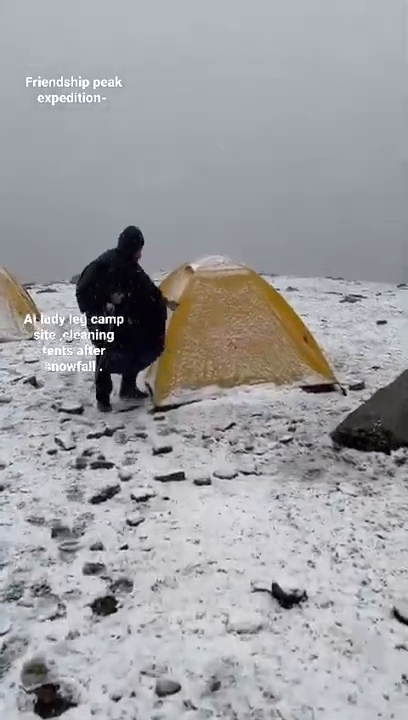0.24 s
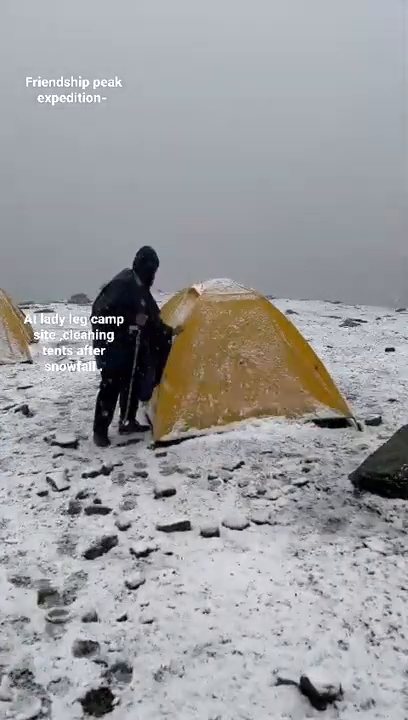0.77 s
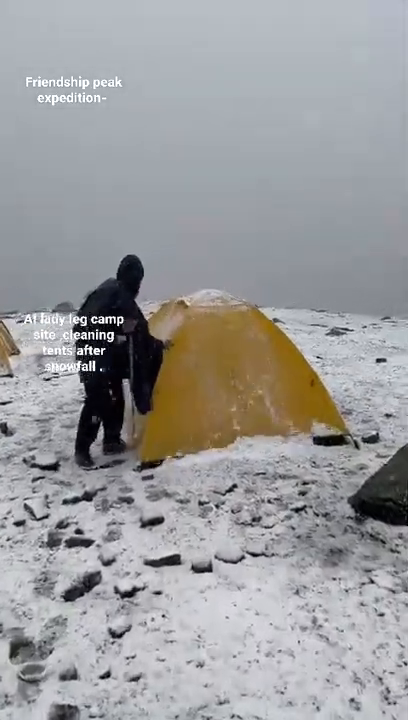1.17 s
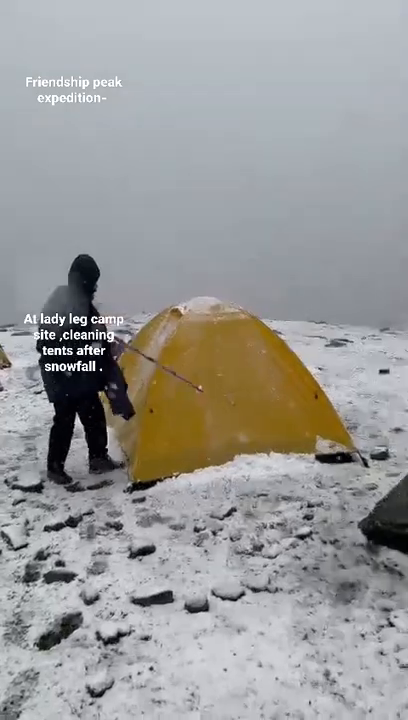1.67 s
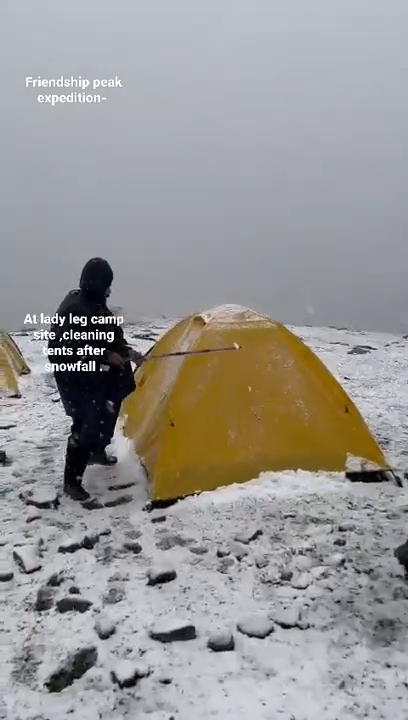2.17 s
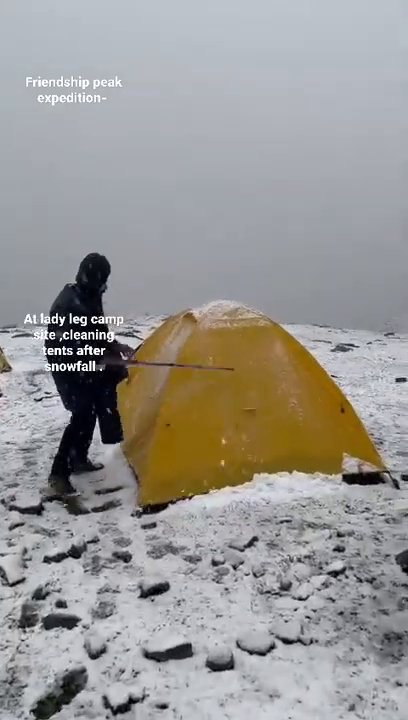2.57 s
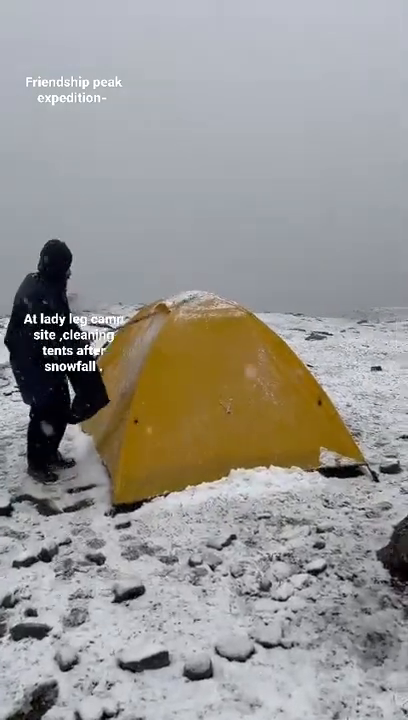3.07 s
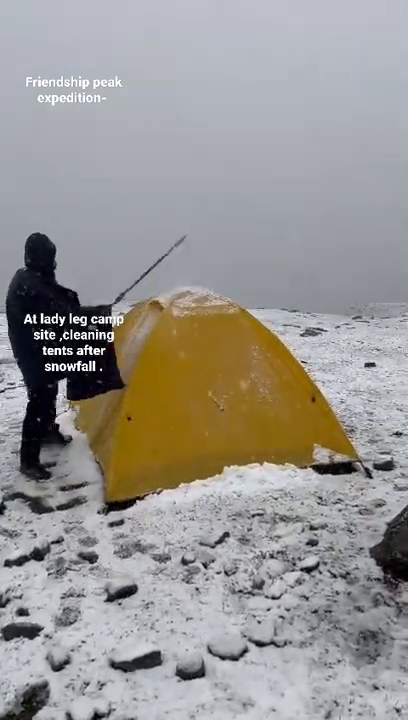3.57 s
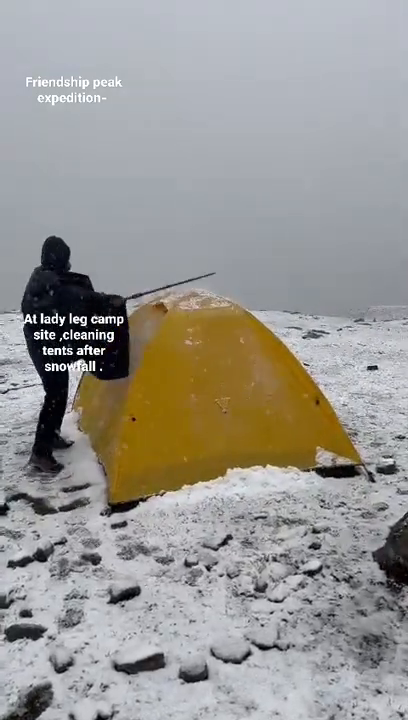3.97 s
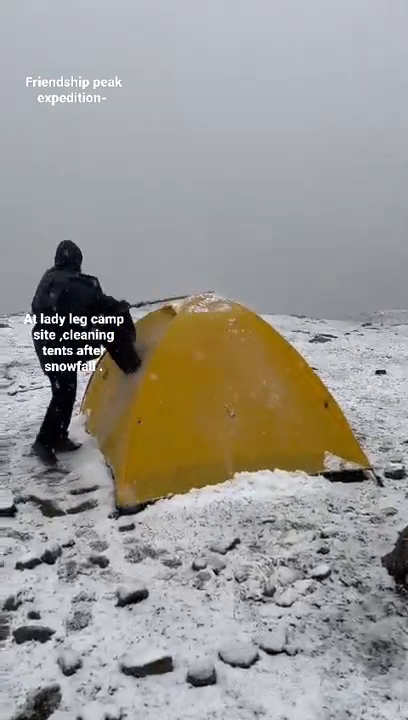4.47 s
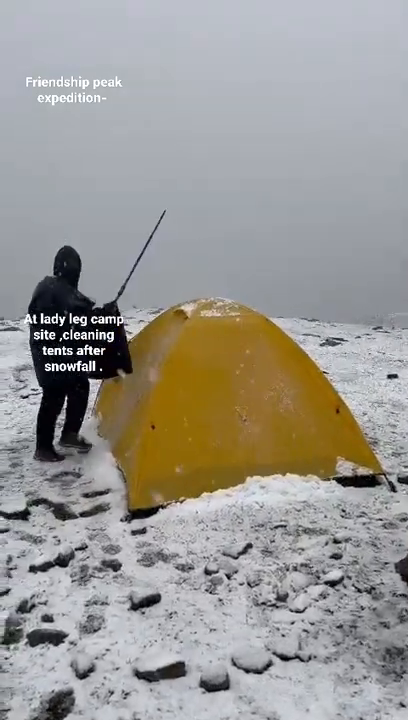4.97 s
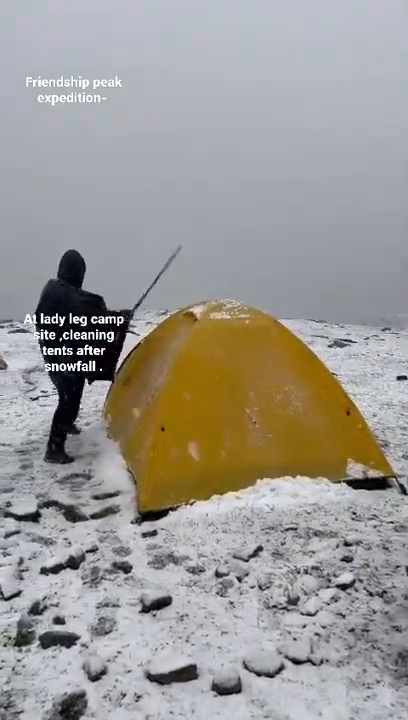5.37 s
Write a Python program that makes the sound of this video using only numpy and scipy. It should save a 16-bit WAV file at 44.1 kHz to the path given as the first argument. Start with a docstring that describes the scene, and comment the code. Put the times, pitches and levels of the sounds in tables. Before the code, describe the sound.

Sharp pole smacks and drum-like thumps on a tent follow soft cloth rustling, while loose snow patters and slides down.

```python
"""A snow-covered tent in the open on a mountain. Its cloth rustles, crumbs patter and loose snow hisses down
it throughout. Boots shift in the snow, creases flick and a faint hum comes and goes. The tent is shaken
by hand: walls heave and panels pop taut. A pole clicks on something hard, then smacks the taut fly
eight times. Each blow cracks, sends a falling whoop through the cloth and ends in a drum-like thump;
the cloth rattles, snow sprays off and the tent sways on."""
import sys
import numpy as np
from scipy import signal
from scipy.fft import rfft, irfft
from scipy.io import wavfile

SR = 44100
rng = np.random.default_rng(int(sys.argv[2]) if len(sys.argv) > 2 else 0)


def master_out(mix):
    """Clip the mix to full scale and print it as 16-bit PCM to the path in sys.argv[1]."""
    frames = np.transpose(np.atleast_2d(mix))
    ceiling = np.clip(frames, -1, 1)
    pcm = np.round(ceiling * 32767).astype(np.int16)
    wavfile.write(sys.argv[1], SR, pcm)


N = 248238
TIME = np.arange(N) / SR
LEAD_S = 0.02  # silence ahead of each impact
FIRM_DB = -20  # thump of a firm blow, the reference for sway and rattle

# blows of the pole: t/s, crack/dB, brightness/(dB per octave), crack t60/s, contact along the pole/0-1,
# shaft ring/dB, ping f/Hz, ping/dB, cloth tension/factor on the knock's pitch, knock/dB, whoop/dB,
# thump/dB, panel f/Hz, rattle/dB, spray/dB, loosened snow/dB
BLOWS = [ (2.494, -20, 5.5, 0.036, 0.38, -32, 2720, -23, 1.23, -22, -31, -36.5, 76.8, -34.5, -38, -58),
         (2.9445, -24, 4, 0.038, .5, -33, 1540, -23, 1.25, -29, -35, -49, 95, -41.5, -44.5, -57.5),
         (3.3968, -24.5, 3.5, 0.066, 0, -30, 1510, -27, .88, -22, -21.5, -25.5, 85.2, -32, -64, -63),
         (3.7119, -18, -3, 0.056, .39, -31, 4160, -18.5, 1.06, -16, -28, -15, 106.6, -34.5, -46, -59),
         (3.9840, -16.5, 2, 0.048, 0.37, -31, 3800, -17, 1.38, -16.5, -17.5, -12, 92.4, -28, -41, -57.5),
         (4.269, -17, 3, 0.026, .09, -27.5, 2050, -21, 1.53, -18.5, -17.5, -14.5, 96.3, -27, -41, -56.5),
         (4.539, -16.5, 10, 0.015, .5, -21.5, 6100, -10, 1.04, -23, -14, -20, 82.1, -27, -40.5, -62.5),
         (5.5223, -20.5, 1.5, 0.04, .39, -28.5, 2570, -13.5, 1.37, -25, -24.5, -30, 72.4, -34.5, -43.5, -76)]
# colour of the pole's first bright snap: f/Hz, level/dB
SNAP = [(400, -30), (1200, 8), (3000, 1.5), (5000, 13), (7000, -5), (9000, 7), (11000, -14.5),
        (11700, -10.5), (12600, -50)]
# colour of cracking cloth: f/Hz, level/dB
CRACK = [(60, -6), (250, -1), (500, 6), (800, 1), (1400, 2), (2000, -4.5), (2700, -2.5), (3400, -10),
         (4600, -11), (6500, -15.5), (8600, -19), (11200, -27.5), (12500, -49)]


def amp(db):
    """Decibels to gain."""
    return 10 ** (np.asarray(db) / 20)


def unit(x):
    """Scales to an rms of one."""
    return x / np.sqrt(np.mean(x ** 2) + 1e-20)


def curve(points, hz):
    """Joins (f/Hz, value) points on a log-frequency axis."""
    f, value = np.transpose(points)
    return np.interp(np.log(hz + 1), np.log(f + 1), value)


def add(mix, s, sound):
    """Mixes a sound in at s seconds."""
    part = mix[:, round(s * SR):][:, :sound.shape[-1]]
    part += sound[..., :part.shape[1]]


def clock(n):
    """Seconds since an impact, held at zero through the silent lead."""
    return np.maximum(np.arange(n) / SR - LEAD_S, 0)


def dying(t, rise, t60):
    """A quick attack, then an exponential decay."""
    return (1 - np.exp(-t / rise)) * np.exp(-np.log(1000) * t / t60)


def wander(n, hz):
    """Random drift with an rms of one, moving at rates up to about hz."""
    f = np.fft.rfftfreq(n, 1 / SR)
    return unit(irfft(rfft(rng.standard_normal(n)) * np.exp(-(f / hz) ** 2) * (f > 0), n))


def flicker(n, db, hz):
    """A gain that wanders by db rms: surges when slow, grit when fast."""
    return amp(db * wander(n, hz))


def noise(spectrum, envelope, tilt_db=0):
    """Coloured stereo noise that follows an envelope; tilt_db per octave tips its treble."""
    # likeness of left and right: f/Hz, correlation/0-1
    likeness = [(200, .995), (1000, .88), (1800, .9), (2600, .7), (4600, .65), (5800, .97), (8000, .96),
                (11000, .92)]
    n = len(envelope)
    hz = np.fft.rfftfreq(n, 1 / SR)
    mid, side = rfft(rng.standard_normal((2, n)) * envelope)
    same = curve(likeness, hz)
    pair = np.sqrt(1 + same) * mid + np.sqrt(1 - same) * side * np.array([[1], [-1]])
    colour = amp(curve(spectrum, hz) + tilt_db * np.log2(1 + hz / 1000))
    return unit(irfft(pair * colour, n)) * np.sqrt(np.mean(envelope ** 2))


def ringing(t, modes, level_db, rise=0.00048):
    """The dying modes of a struck thing."""
    return sum(amp(level_db + db) * dying(t, rise, t60) * np.sin(2 * np.pi * hz * t)
               for hz, db, t60 in modes)


def stirred_cloth():
    """Moving cloth billows, rustles and sheds snow and crumbs of crust, all louder the harder it moves."""
    # how hard the cloth is stirred: t/s, level/dB
    stirring = [(0, -64.5), (.19, -58), (.33, -60), (.71, -54.5), (.745, -45.5), (.91, -48), (.965, -40.5),
                (1.03, -39.5), (1.12, -47.5), (1.32, -47.5), (1.52, -55), (2.2, -61.5), (2.46, -56),
                (2.6, -47.5), (2.76, -55), (3.15, -55.5), (3.6, -59), (4.15, -54.5), (4.72, -57.5),
                (5.24, -64.5), (5.62, -55.5)]
    # colour of the billowing walls: f/Hz, level/dB
    billow_colour = [(20, -31), (35, -3), (55, 7.5), (120, 0), (200, -2), (320, -17), (700, -65)]
    # colour of the rustle: f/Hz, level/dB
    rustle_colour = [(130, -4.5), (270, 2), (650, -1.5), (1000, -4), (1500, -6.5), (2400, -8.5),
                     (4000, -13), (9000, -52), (12500, -85)]
    cloth_db = np.interp(TIME, *np.transpose(stirring))
    stir_db = cloth_db + 56  # relative to a gentle stir
    flaps = unit(flicker(N, db=1.5, hz=30))
    billow = noise(billow_colour, amp(-53 + 0.81 * stir_db) * flaps)
    creases = unit(flicker(N, db=1.8, hz=200))
    surges = unit(flicker(N, db=1.5, hz=21.3))
    rustle = noise(rustle_colour, amp(cloth_db - 3) * creases * surges)
    crust = amp(cloth_db - 9) * crumbs(N, range_hz=(528, 4540), per_s=480, pitches=24)
    return billow + rustle + crust + sliding_snow(stir_db)


def crumbs(n, range_hz, per_s, pitches):
    """Grains of snow patter on the cloth, each ringing for a few cycles; most are small."""
    out, t = np.zeros(n), np.arange(SR // 40) / SR
    for hz in np.geomspace(*range_hz, pitches):
        sizes = amp(-16 * rng.random(n)) * rng.choice([-1, 1], n)
        lands = rng.random(n) < per_s / pitches / SR
        grain = dying(t, rise=0.5 / hz, t60=9.7 / hz) * np.sin(2 * np.pi * hz * t)
        out += signal.oaconvolve(lands * sizes, grain)[:n]
    return unit(out)


def sliding_snow(stir_db):
    """Snow and icy pellets run down when the cloth stirs, after a tug or blow, and as a patch lets go."""
    # tugs of the hand: t/s, loosened snow/dB
    tugs = [(.722, -56.5), (.94, -57.5)]
    # patches slipping off late: crest t/s, half length/s, level/dB
    slips = [(1.675, 0.31, -60.5), (3.3, 0.053, -59.5), (4.98, 0.28, -59)]
    # colour of the hiss as heard, bright with hollow gaps near 6 and 10 kHz: f/Hz, level/dB
    heard_colour = [(800, 5), (2000, 10.5), (3200, 9), (4500, 10.5), (5250, 12.5), (5900, -34),
                    (6500, -15.5), (7000, 7), (8900, 10), (10400, -13.5), (11400, 0.5), (12300, -67)]
    lag_s = 0.017  # the snow trails the cloth
    hold = np.exp(-1 / (lag_s * SR))
    power = signal.lfilter([1 - hold], [1, -hold], amp(-66 + 0.82 * stir_db) ** 2)
    for s, *_, snow_db in tugs + BLOWS:
        power += (amp(snow_db) * dying(np.maximum(TIME - s, 0), rise=0.0075, t60=4.25)) ** 2
    for s, half_length, slip_db in slips:
        power += (amp(slip_db) * np.exp(-((TIME - s) / half_length) ** 2 / 2)) ** 2
    flow = np.sqrt(power) * flicker(N, db=1, hz=15)  # it runs in spurts
    grains = unit(flicker(N, db=1.5, hz=2000))
    pellets = amp(-15.5) * flow * crumbs(N, range_hz=(2200, 4700), per_s=160, pitches=10)
    return noise(heard_colour, flow * grains) + pellets


def hum():
    """A faint low hum swells now and then, its pitch wavering."""
    # swells: crest t/s, half length/s, f/Hz, level/dB
    swells = [(0.303, 0.21, 284.3, -62.5), (1.744, 0.11, 150.3, -53.5), (3.38, 0.17, 249, -63),
              (4.19, 0.27, 173, -52), (4.44, 0.31, 239.8, -58.5), (5.163, 0.18, 219.4, -59.5)]
    out = np.zeros(N)
    for s, half_length, hz, level_db in swells:
        turns = np.cumsum(hz * (1 + 0.0259 * wander(N, hz=13.3))) / SR
        out += amp(level_db) * np.exp(-((TIME - s) / half_length) ** 2) * np.sin(2 * np.pi * turns)
    return out


def boots():
    """Boots press into thin snow: a short, gritty crunch."""
    # shifts of the feet: t/s, level/dB
    steps = [(.145, -54), (.375, -55.5), (0.536, -52), (1.94, -67), (3.101, -50)]
    # colour of the crunch: f/Hz, level/dB
    crunch = [(150, -7), (500, 4), (1300, 0), (2200, -8), (4500, -6), (6000, -22), (8500, -20),
              (12000, -60)]
    out, t = np.zeros((2, N)), clock(SR // 4)
    for s, level_db in steps:
        grit = flicker(len(t), db=3, hz=400)
        add(out, s - LEAD_S, amp(level_db) * noise(crunch, dying(t, rise=0.011, t60=0.19) * grit))
    return out


def crinkles():
    """A crease flicks over or a clod lands: a dry tick about an octave wide."""
    # creases and clods: t/s, level/dB, centre f/Hz
    ticks = [(0.167, -57, 900), (.262, -53, 800), (.394, -58, 1500), (.554, -59, 2800), (.694, -45, 800),
             (.710, -53, 2500), (0.747, -40, 1500), (.968, -40, 1300), (.988, -43, 1500),
             (1.009, -45, 1700), (1.021, -44, 1100), (1.072, -37, 1500), (1.454, -48, 3000),
             (1.626, -46, 420), (1.720, -45, 1090), (1.726, -45, 4300), (1.752, -43.5, 700),
             (1.952, -46.5, 900), (2.005, -56, 1000), (2.072, -61, 1200), (2.231, -57, 1900),
             (2.447, -40, 850), (2.556, -38, 1100), (2.595, -39, 1000), (2.611, -38, 1150),
             (2.701, -46, 900), (2.791, -47.5, 2400), (2.863, -45, 650), (3.009, -41, 1600),
             (3.108, -45, 1000), (3.122, -41, 750), (3.325, -46, 800), (3.421, -36, 8000),
             (3.454, -49, 800), (3.843, -46, 2210), (4.109, -46, 900), (4.292, -47, 2700),
             (4.625, -41, 900), (4.727, -46, 2200), (4.774, -48, 800), (5.092, -61, 2600),
             (5.283, -52, 1900), (5.36, -42.5, 1390), (5.599, -46, 1090)]
    out, t = np.zeros((2, N)), clock(SR // 10)
    octaves = np.arange(-4, 5) / 2
    for s, level_db, hz in ticks:
        band = np.transpose([hz * 2 ** octaves, -13.5 * octaves ** 2])
        add(out, s - LEAD_S, amp(level_db) * noise(band, dying(t, rise=0.00061, t60=0.018)))
    return out


def wall_heaves():
    """A whole wall swings out and back: a soft bump of a cycle or two, with no snap."""
    # heaves: crest t/s, level/dB, f/Hz
    heaves = [(.69, -37.5, 59.4), (0.779, -32, 66.6), (1.029, -31.5, 75), (1.464, -36.5, 85),
              (2.799, -41, 69.6), (4.782, -48, 78.6), (4.849, -39, 66), (5.081, -41, 84),
              (5.19, -44.5, 74.6), (5.25, -43, 63.6), (5.555, -30, 132)]
    out, t = np.zeros((2, N)), np.arange(SR // 5) / SR
    middle = t.mean()
    for s, level_db, hz in heaves:
        cycles = (t - middle) * hz
        bump = np.exp(-(cycles / 0.57) ** 2) * np.cos(2 * np.pi * cycles)
        add(out, s - middle, amp(level_db) * bump)
    return out


def panel_pops():
    """A slack panel jerks tight: a dull snap, a short falling whoop and a thump on its low note."""
    # pops: t/s, snap/dB, whoop/dB, thump/dB, panel f/Hz, fall of the whoop/Hz
    pops = [(0.695, -62, -59, -43, 79, 933), (0.745, -51, -58, -33, 84, 933),
            (0.84, -50, -30.5, -36, 130, 690), (1.009, -47, -41, -37, 93, 933),
            (1.045, -55, -29, -42, 109, 805), (1.233, -67, -40, -31.5, 116, 450),
            (1.261, -80, -35.5, -39, 153, 745), (1.368, -71, -37, -50, 188, 600),
            (1.397, -78, -42, -39, 182, 500), (1.42, -78, -39, -40, 167, 596),
            (1.607, -51, -45, -51, 288, 500), (1.622, -48.5, -34, -57, 162, 660),
            (2.515, -46, -41, -31, 189, 600), (2.572, -50, -55, -29, 214, 500),
            (2.607, -47, -47, -32, 130, 905), (2.628, -52, -40, -38, 132, 600),
            (3.158, -54, -66, -35.5, 97, 930), (3.843, -52.5, -66, -36, 81.4, 933),
            (4.603, -63, -57, -33, 93, 933), (4.624, -56, -34, -45, 120, 930),
            (4.723, -52, -57, -33.5, 120, 780), (5.360, -48, -36, -30.5, 69, 840),
            (5.586, -41, -44, -34.5, 131, 933)]
    out, t = np.zeros((2, N)), clock(SR // 5)
    for s, snap_db, whoop_db, thump_db, panel_hz, fall_hz in pops:
        snap = amp(snap_db + 2.5) * noise(CRACK, dying(t, rise=0.00023, t60=0.085), tilt_db=-5.5)
        panel = membrane(t, whoop_db, thump_db, panel_hz, fall_hz,
                         glide_s=0.0027, whoop_t60=0.051, crest_s=0.00862, width_s=0.0092)
        add(out, s - LEAD_S, snap + panel)
    return out


def membrane(t, whoop_db, thump_db, panel_hz, fall_hz, glide_s, whoop_t60, crest_s, width_s):
    """Short waves leave the cloth first: the tone falls to the panel's note, where the wall thumps."""
    turns = panel_hz * t + fall_hz * glide_s * (1 - np.exp(-t / glide_s))
    tone = np.sin(2 * np.pi * (np.interp(crest_s, t, turns) - turns))  # crosses zero at crest_s
    whoop = amp(whoop_db) * dying(t, rise=0.0016, t60=whoop_t60)
    thump = amp(thump_db) * np.exp(-((t - crest_s) / width_s) ** 2) * (1 - np.exp(-t / 0.011))
    ring = amp(thump_db - 16.5) * dying(t, rise=0.016, t60=0.32)
    return (whoop + thump + ring) * tone


def pole_click(s=2.1562, level_db=-38):
    """The pole knocks lightly on something hard as it is brought round: a tick and a short ring."""
    # tones of the click: f/Hz, level/dB, t60/s
    tones = [(1800, 2, 0.017), (1900, -13, 0.093), (1300, -7, .025), (4430, -8, 0.013), (5020, 0, 0.013),
             (8200, -23, 0.0035)]
    out, t = np.zeros((2, N)), clock(SR // 5)
    tick = amp(level_db - 4.5) * noise(SNAP, dying(t, rise=0.00017, t60=0.0086))
    add(out, s - LEAD_S, tick + ringing(t, tones, level_db))
    return out


def pole_blows():
    """The pole snaps and cracks on the fly, which answers like a drum, rattles and throws off snow."""
    # hollow knock of the cloth round the struck spot: f/Hz, level/dB, t60/s
    knock_modes = [(423, -12, 0.056), (613.5, 2.5, 0.035), (743, 0, 0.045), (954, -8, 0.023),
                   (1360, -21, 0.016)]
    out, t = np.zeros((2, N)), clock(SR // 2)
    for (s, crack_db, bright_db, crack_t60, contact, shaft_db, ping_hz, ping_db, tension,
         knock_db, whoop_db, thump_db, panel_hz, rattle_db, spray_db, _) in BLOWS:
        snap = amp(crack_db + 2) * noise(SNAP, dying(t, rise=0.001, t60=0.014), bright_db)
        slaps = flicker(len(t), db=3.74, hz=1400)  # the shaft lands along its length in tiny slaps
        crack = noise(CRACK, dying(t, rise=0.0016, t60=crack_t60) * slaps, bright_db)
        crack = amp(crack_db + 0.5) * dispersed(damped(crack, t))
        tuned_modes = [(hz * tension, db, t60) for hz, db, t60 in knock_modes]
        knock = ringing(t, tuned_modes, knock_db, rise=0.0038)
        ping = ringing(t, [(ping_hz, 0, 0.014)], ping_db)
        # the lower the panel's note, the later and longer its thump
        wall = membrane(t, whoop_db, thump_db, panel_hz, fall_hz=1630, glide_s=0.396 / panel_hz,
                        whoop_t60=0.037, crest_s=1.692 / panel_hz, width_s=0.84 / panel_hz)
        hit = ground_bounce(snap + crack + knock + ping + wall + shaft_ring(t, shaft_db, contact))
        add(out, s - LEAD_S, hit + cloth_rattle(t, rattle_db, thump_db) + snow_spray(t, spray_db))
    return out


def damped(x, t, above_hz=5300, decay_s=0.045):
    """Wet cloth soaks up the treble first."""
    hz = np.fft.rfftfreq(x.shape[1], 1 / SR)
    low = irfft(rfft(x) / (1 + (hz / above_hz) ** 4), x.shape[1])
    return low + (x - low) * np.exp(-t / decay_s)


def dispersed(x, bass_lag_s=0.01403, half_lag_hz=261.5):
    """Long waves cross taut cloth slowly, so the bass arrives behind the treble."""
    hz = np.fft.rfftfreq(x.shape[1], 1 / SR)
    turns = bass_lag_s * half_lag_hz * np.arctan(hz / half_lag_hz)
    return irfft(rfft(x) * np.exp(-2j * np.pi * turns), x.shape[1])


def shaft_ring(t, level_db, contact):
    """Each bending mode of the pole speaks only as far as it moves at the point of contact."""
    # modes from the fourth upwards, choked by the cloth: f/Hz, level/dB, t60/s
    modes = [(2280, -14, 0.026), (3125, 9.5, 0.016), (4200, -21, 0.016), (4930, 5, 0.021),
             (5950, -16, 0.016), (9200, 5, 0.013)]
    shapes = np.sin(np.pi * contact * (4 + np.arange(len(modes))))
    return sum(shape * ringing(t, [mode], level_db) for shape, mode in zip(shapes, modes))


def ground_bounce(x, delay_s=0.001534, gain=0.18, soft_hz=1900):
    """Adds a dull reflection off the snow, which hollows the low mids."""
    hz = np.fft.rfftfreq(x.shape[1], 1 / SR)
    bounce = gain * np.exp(-2j * np.pi * hz * delay_s) / (1 + (hz / soft_hz) ** 2)
    return irfft(rfft(x) * (1 + bounce), x.shape[1])


def cloth_rattle(t, level_db, thump_db):
    """The struck cloth rattles in clumps; a slack wall thumps less and rattles longer."""
    # colour of the rattle: f/Hz, level/dB
    colour = [(25, -2), (60, 9), (130, 7.5), (300, -4.5), (650, -0.5), (1400, -6.5), (2400, -10.5),
              (4500, -12.5), (6800, -20.5), (9000, -21), (11500, -31), (12500, -60)]
    clumps = flicker(len(t), db=2, hz=240)
    t60 = 0.15 * 2 ** ((FIRM_DB - thump_db) / 36)
    rattle = amp(level_db + 7.5) * noise(colour, dying(t, rise=0.0029, t60=t60) * clumps)
    return dispersed(damped(rattle, t))


def snow_spray(t, level_db):
    """Snow thrown off by a blow hisses and patters back down."""
    # colour of the spray as heard, with a hollow gap near 6 kHz: f/Hz, level/dB
    colour = [(120, 11), (300, 7.5), (700, -1), (1500, -2), (2600, -8.5), (4700, -9), (6000, -28),
              (7400, -2.5), (9000, -0.5), (12000, -40)]
    grit = flicker(len(t), db=0.5, hz=500)
    thrown = amp(level_db) * dying(t, rise=0.0043, t60=0.45)
    patter = amp(-3) * thrown * crumbs(len(t), range_hz=(465, 2530), per_s=330, pitches=12)
    return damped(noise(colour, thrown * grit), t) + patter


def tent_sway():
    """The whole tent sways on after each blow: a low rumble that grows with the thump."""
    # colour of the sway: f/Hz, level/dB
    colour = [(20, -25), (45, 6), (72, 12), (110, -19), (180, -3), (320, -33), (700, -51)]
    power = np.zeros(N)
    for s, *_, thump_db, _panel_hz, _rattle_db, _spray_db, _snow_db in BLOWS:
        gain = amp(-41 + 0.26 * (thump_db - FIRM_DB))
        power += (gain * dying(np.maximum(TIME - s, 0), rise=0.019, t60=0.55)) ** 2
    return noise(colour, np.sqrt(power))


def rebounds():
    """The whipping shaft meets the cloth again just after a blow: a short, dry slap."""
    # slaps: t/s, level/dB, brightness/(dB per octave)
    slaps = [(2.502, -33, -1), (2.9483, -20, -3), (3.4025, -28, 7), (3.4076, -20, -18),
             (3.7127, -15.5, 2.5), (3.9856, -15, 3), (3.9902, -15, -6), (5.5281, -18.5, 7)]
    out, t = np.zeros((2, N)), clock(SR // 10)
    for s, level_db, bright_db in slaps:
        slap = noise(CRACK, dying(t, rise=0.00034, t60=0.014), bright_db)
        add(out, s - LEAD_S, amp(level_db) * dispersed(slap))
    return out


def scene():
    """All layers summed with no reverb, as over open snow."""
    handling = stirred_cloth() + hum() + boots() + crinkles() + wall_heaves() + panel_pops()
    return handling + pole_click() + pole_blows() + tent_sway() + rebounds()


def record(dry):
    """Two microphone ports hear each pitch at their own level and phase; the top treble is cut."""
    # balance of the ports: f/Hz, left minus right/dB
    balance = [(150, 0), (350, 1.5), (760, 10), (1080, 5), (1400, 7), (1800, .7), (2600, 2), (4000, 1),
               (8000, .3)]
    # phase between the ports: f/Hz, lead of the left/rad
    phase = [(700, 0), (1200, -.4), (1700, 0), (2100, .8), (2450, 2.2), (3200, 1.3), (4100, .3),
             (5000, 1.9), (6000, 3.3), (8000, 6.3), (10200, 9.4), (12000, 12.6)]
    hz = np.fft.rfftfreq(N, 1 / SR)
    side = np.array([[0.5], [-0.5]])
    gains = amp(side * curve(balance, hz))
    gains /= np.sqrt(np.mean(gains ** 2, axis=0))  # constant power
    heard = irfft(rfft(dry) * gains * np.exp(1j * side * curve(phase, hz)), N)
    lowpass = signal.firwin(141, cutoff=12400, window=("kaiser", 9), fs=SR)
    return signal.oaconvolve(heard, lowpass[None], "same")


dry = scene()
out = record(dry)
master_out(out)
```